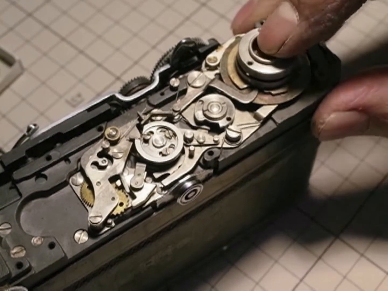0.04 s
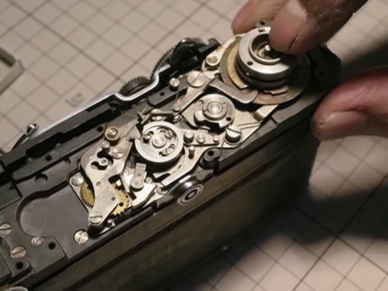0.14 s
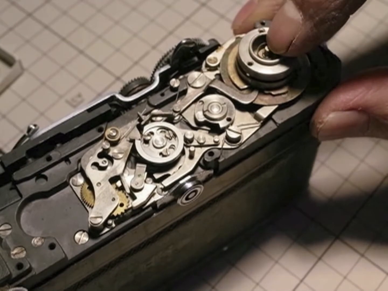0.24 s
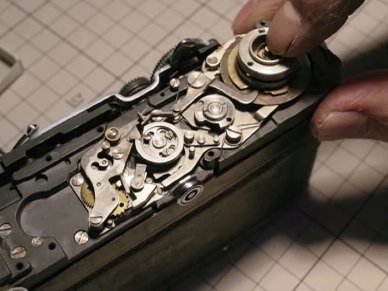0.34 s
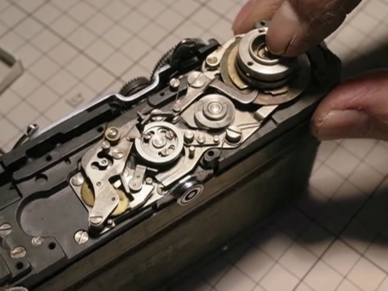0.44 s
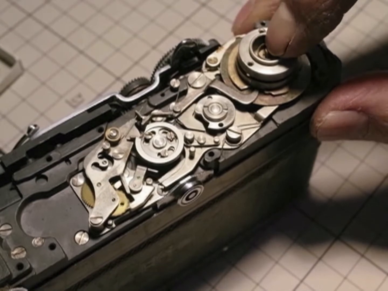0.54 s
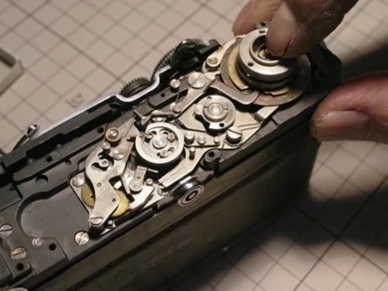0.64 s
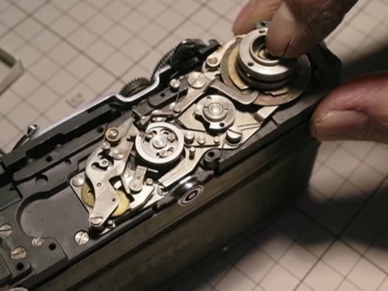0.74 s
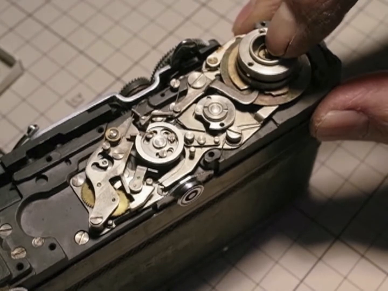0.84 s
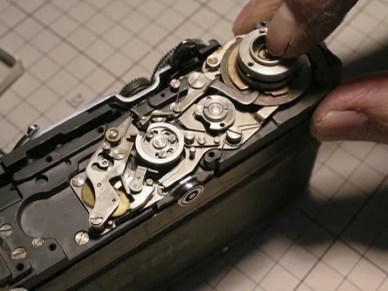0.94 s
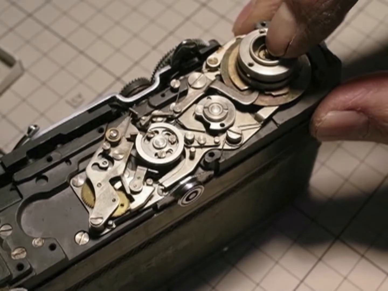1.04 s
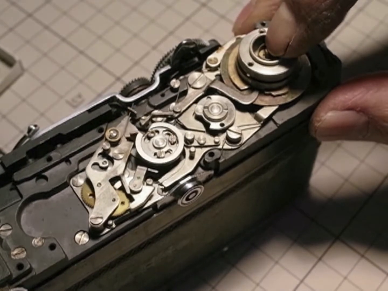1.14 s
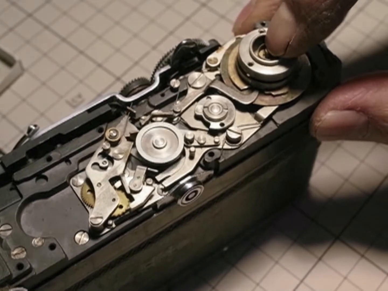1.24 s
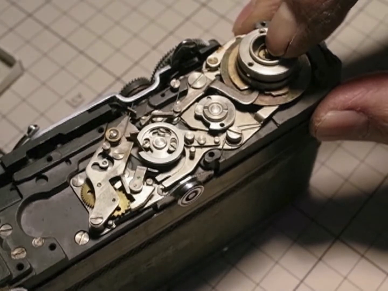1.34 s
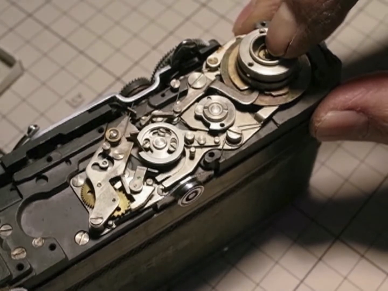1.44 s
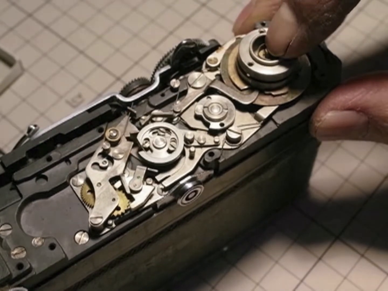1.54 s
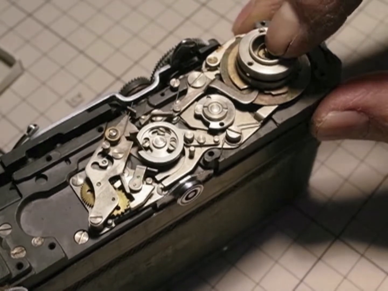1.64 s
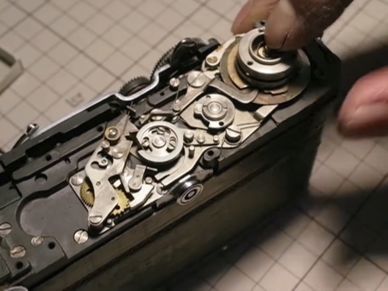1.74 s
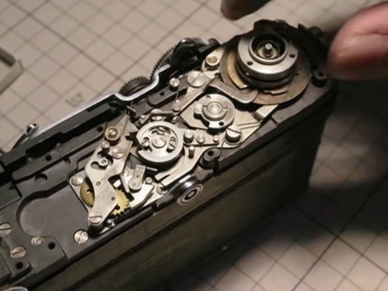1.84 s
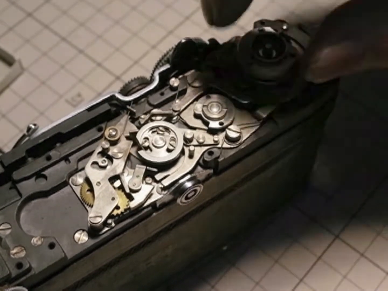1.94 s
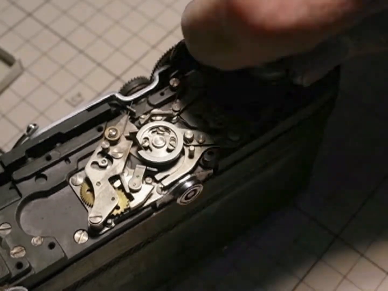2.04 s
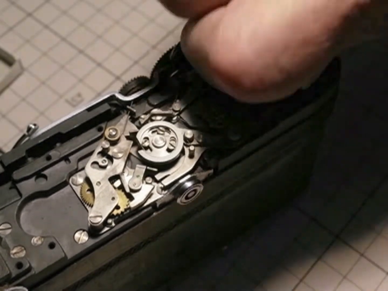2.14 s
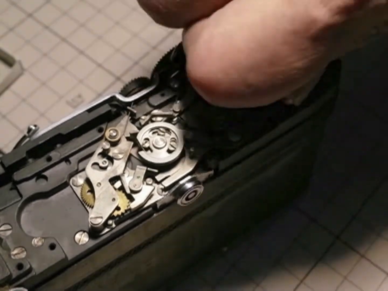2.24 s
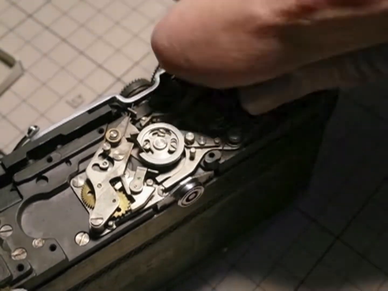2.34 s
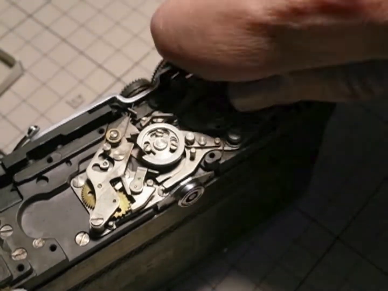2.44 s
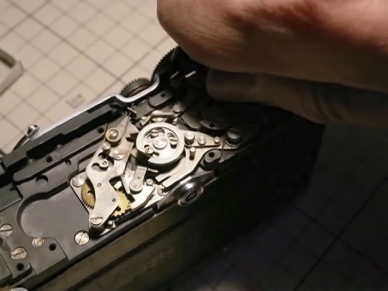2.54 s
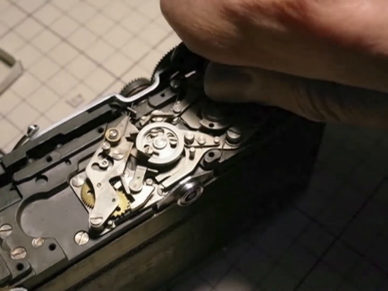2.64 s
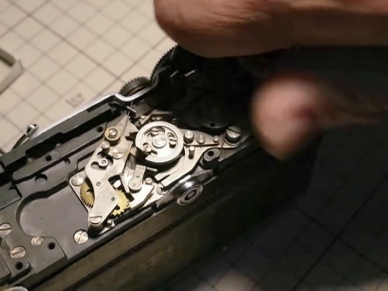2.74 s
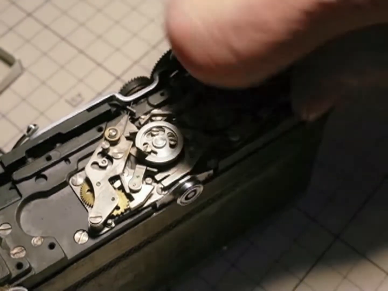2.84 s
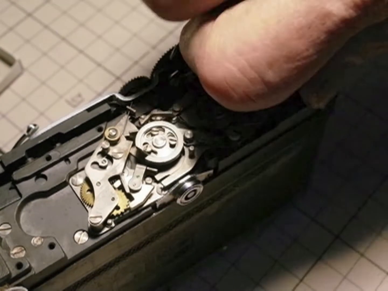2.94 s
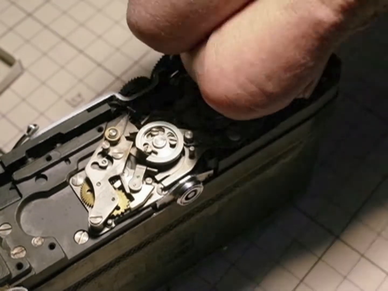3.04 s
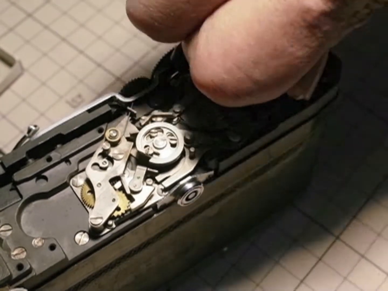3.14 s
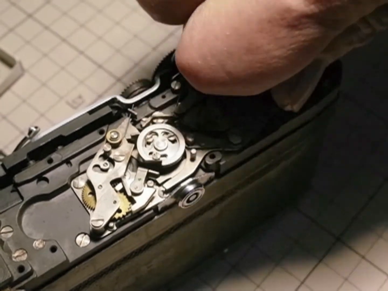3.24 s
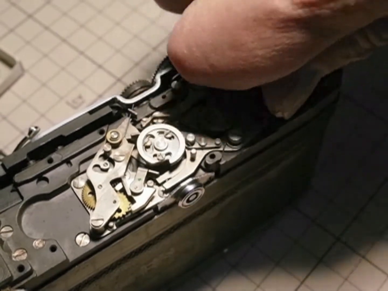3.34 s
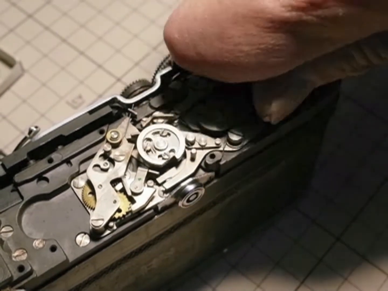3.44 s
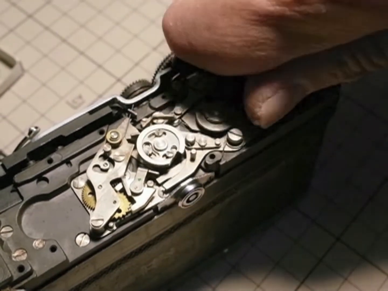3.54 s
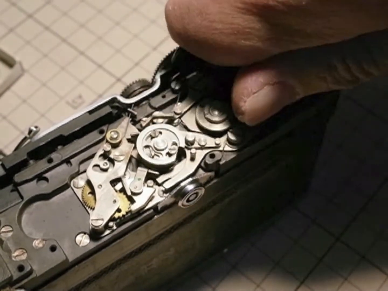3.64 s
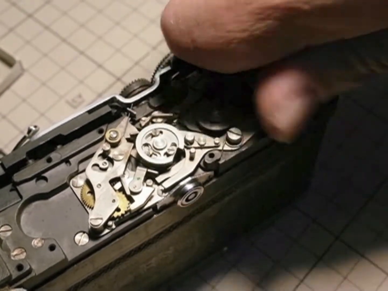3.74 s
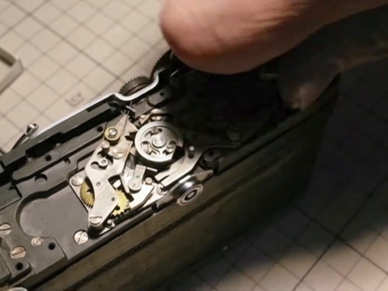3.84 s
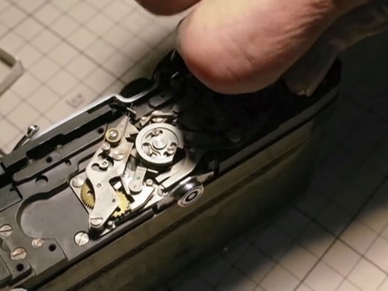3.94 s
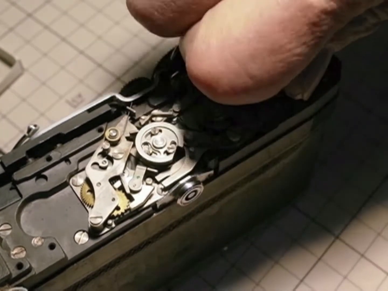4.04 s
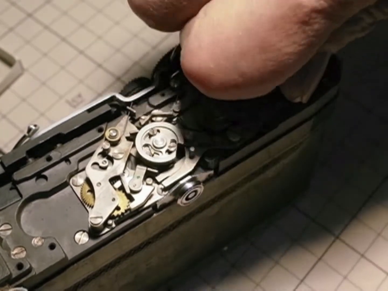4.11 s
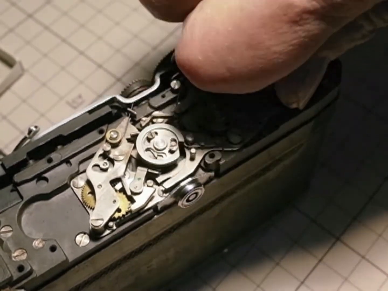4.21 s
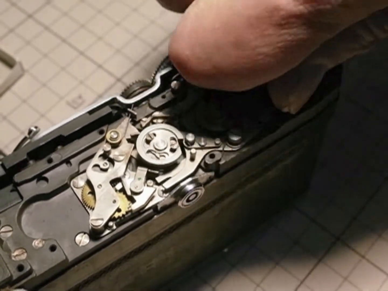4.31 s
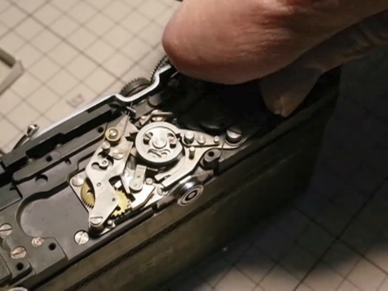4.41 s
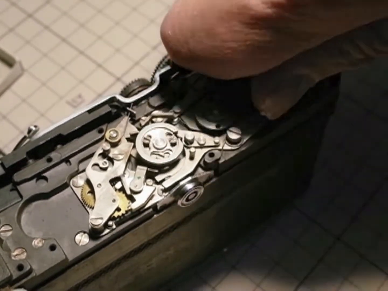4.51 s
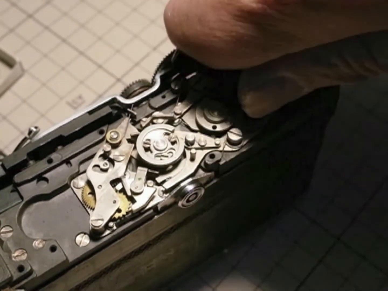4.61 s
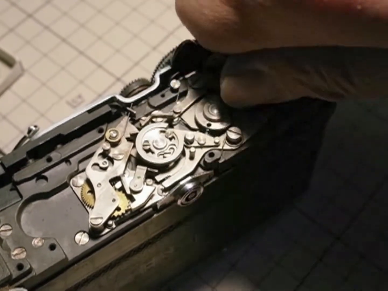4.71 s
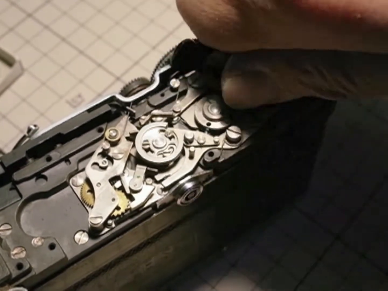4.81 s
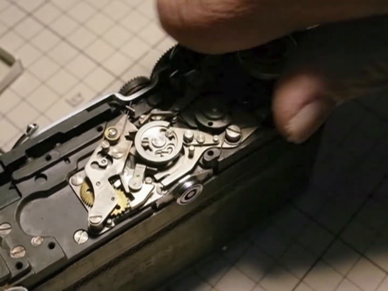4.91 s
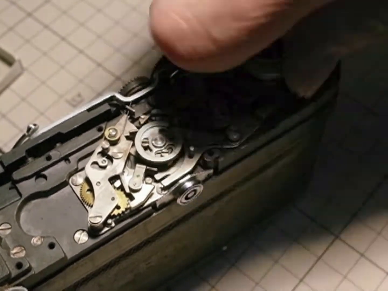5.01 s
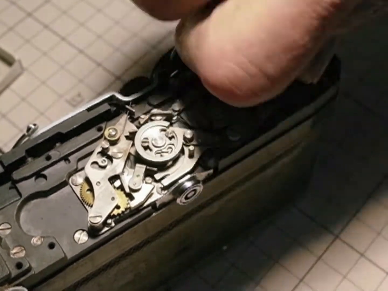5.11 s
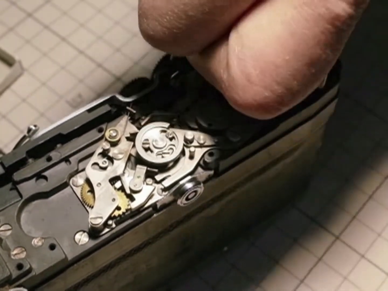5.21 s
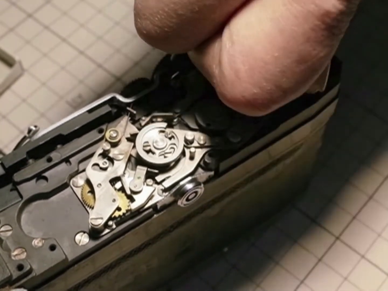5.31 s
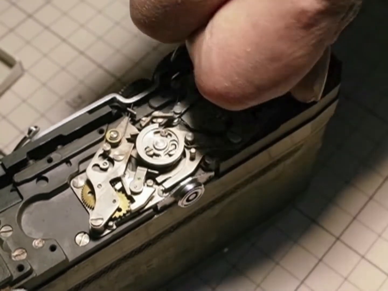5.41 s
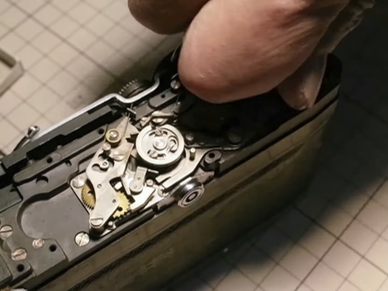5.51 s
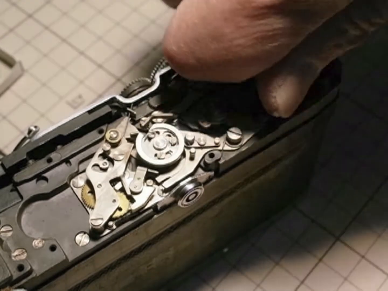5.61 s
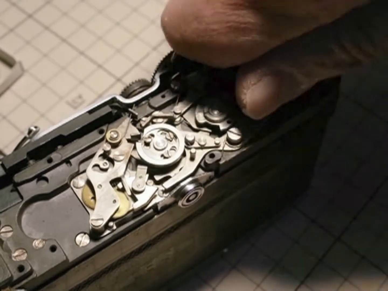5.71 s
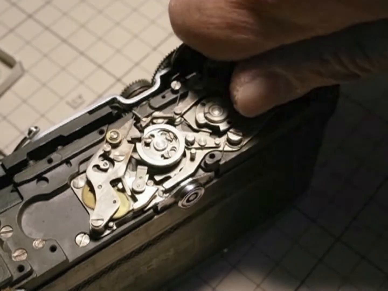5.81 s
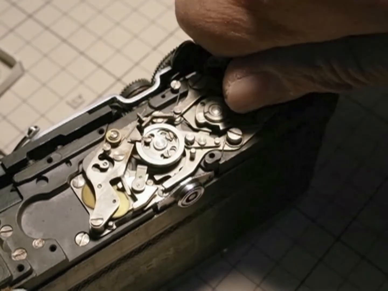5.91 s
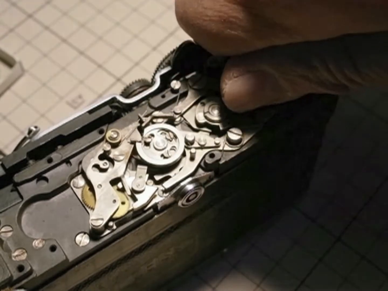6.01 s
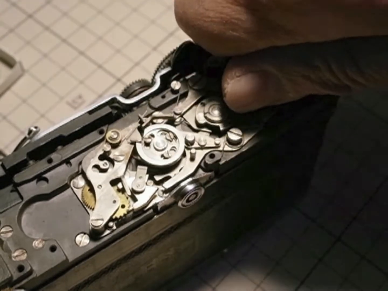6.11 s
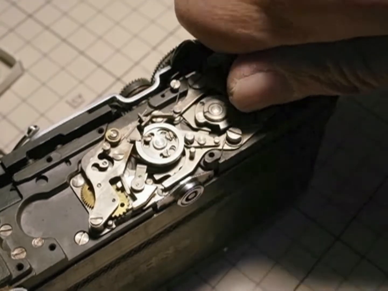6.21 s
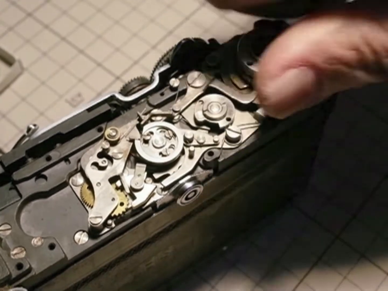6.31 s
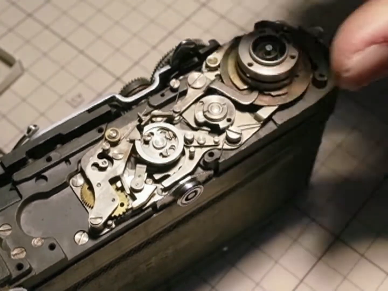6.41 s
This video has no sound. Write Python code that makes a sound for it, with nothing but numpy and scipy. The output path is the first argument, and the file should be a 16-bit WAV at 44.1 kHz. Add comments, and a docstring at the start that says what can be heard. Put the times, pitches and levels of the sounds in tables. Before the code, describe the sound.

A quiet indoor room: soft airy noise, low fan hum and a very faint whine throughout, with a barely audible distant chirp near 0.4 s. At 0.83-0.86 s an uncovered camera shutter fires very close by: a quick click, then a sharp bright snap with a brief whirr. From 0.87 to 1.59 s the escapement buzzes, a thin, high metallic chatter of roughly 250-300 uneven strikes per second, slowing slightly, then speeding up at the end. At 1.6 s the second curtain slams with a loud, dry clack and short rattle. Tiny latch ticks follow at 1.8 and 2.0 s. From 2.6 to 6.1 s fingers wind in short strokes: very quiet ratchet ticks in loose clusters, with faint gritty scrapes. Firmer clicks stand out at 3.52, 4.25 and 5.87 s, the last followed by a light scrape. Another faint chirp at 5.1 s; then only room hum.

```python
"""A quiet room with fan hum and a faint whine: on the desk, an uncovered camera shutter fires and is wound.
The first curtain flies open, the slow-speed escapement buzzes, the second curtain slams shut; fingers then
wind in short strokes with ratchet clicks. Blows are snaps and noise bursts filtered by the body or the metal
parts; whirrs and scrapes are gritty noise; the room is coloured noise, steady sines and faint chirps.
A small, bright microphone sits close by."""
import sys
import numpy as np
from scipy import signal
from scipy.fft import rfft, irfft
from scipy.io import wavfile
from scipy.ndimage import uniform_filter1d

SR = 44100
rng = np.random.default_rng(int(sys.argv[2]) if len(sys.argv) > 2 else 0)


def unload_wav(signal):
    """Save mono or channel-first audio to the path in sys.argv[1] as 16-bit WAV at rate SR, clipped to [-1, 1]."""
    wavfile.write(
        sys.argv[1],
        SR,
        np.round(np.clip(np.atleast_2d(signal).T, -1, 1) * 32767).astype(np.int16),
    )


N = 284886
HZ = np.fft.rfftfreq(8192, 1 / SR)  # frequency grid for the filter colours

# Curtain blows, bounces, button and latch drops; the band levels add to the level, sizzle by 3 dB at most:
# (time [s], level [dB], body knock [dB], plate clack [dB], top sizzle [dB], decay time [ms])
BLOWS = [(0.8262, -27, -12, 6, -10, 1.7), (0.8384, -17, -38, -12, -5, 1.5), (0.8412, -35, -32, -6, -6, 1.3),
         (0.8453, -23, -32, -11, -4, 1.1), (0.8475, -6.5, -10.5, -4, 1.5, 1.94),
         (0.8622, -29, -13, -7, -4, 0.86), (0.865, -32, -24, -12, -13, 0.41),
         (1.5922, -28, -14.5, -20, -14, 1.1), (1.5962, -27, -37, -4, -12, 0.6),
         (1.6039, -3.5, -13.5, -13, -10, 1.6), (1.6073, -10.5, -10.5, -16, -2.5, 0.54),
         (1.6103, -26.5, -7, 5, -6, 0.6), (1.6202, -34, -27, -15, 4, 1.2),
         (1.624, -25, -21, -4.5, -10, 1.16), (1.8329, -45.5, -4.5, -2, -3.5, 1.65),
         (2.0077, -58, 0.5, 15.5, -6, .3), (2.0091, -44, 4.5, 15.5, 2.5, 0.27),
         (3.5165, -58.5, -22, -10, 5, 2.7), (3.5226, -23.5, -15.5, -6, -2.5, 1.64),
         (4.2472, -23, -21, -13.5, -15, 0.98), (5.861, -50, -26.5, -15.5, -1, 2.64),
         (5.8666, -18.5, -17, -13, -4.5, 1.56), (5.8692, -28, -16, -2, -6, 0.59)]
# Ratchet ticks while winding: (time [s], level [dB], dullness [dB], top sizzle [dB])
RATCHET_TICKS = [(2.6, -62.5, 9.5, -9.5), (2.6865, -42, -16, -9), (2.6973, -47, 5.5, -18),
                 (2.729, -53, 2.5, -18), (2.748, -57, 2, -22.5), (2.7605, -52.5, 2, -22),
                 (2.793, -55, 4, -13), (2.8287, -40, -0.5, -5.5), (2.8616, -52, -0.5, -26.5),
                 (2.8754, -49.5, -4.5, -18), (3.001, -54.5, -4.5, -10), (3.0084, -54.5, -5.5, -7),
                 (3.031, -61, 9.5, -13.5), (3.331, -60, -4, -6), (3.414, -56, 4.5, -13),
                 (3.428, -61, 0, -13.5), (3.4687, -50, 3.5, -21), (3.474, -60, 7, -10),
                 (3.488, -61.5, 7.5, -15), (3.798, -55.5, -1, -5.5), (3.805, -50, -3, -15),
                 (3.8251, -54.5, 8, -8), (3.962, -61, 7.5, -17.5), (4.152, -51, -5, -5),
                 (4.168, -61, 6.5, -17), (4.562, -50.5, 2.5, -12.5), (4.577, -52, 1, -4),
                 (4.867, -47, -5.5, -12.5), (4.8766, -50.5, -3, -9), (4.884, -54, 0, -14),
                 (4.896, -60.5, 0, -13), (4.9232, -60, -2, -8.5), (4.9308, -51.5, 1, -9),
                 (4.9556, -43, -3.5, -16), (5.132, -60, -2.5, -12), (5.186, -57.5, -1.5, -12),
                 (5.3562, -55.5, -4, -3.5), (5.363, -50, -5.5, -23.5), (5.3694, -55, 6, -11),
                 (5.699, -61.5, -0.5, -14), (5.712, -55, -5, -8.5), (5.721, -56.5, 3.5, -13),
                 (5.73, -50.5, 1, -14.5), (5.7494, -46.5, 3, -8), (5.7536, -41, 1, -6.5),
                 (5.772, -56.5, -9, -5), (5.801, -53, -5, -11), (5.822, -57, -4, -12),
                 (5.8425, -53, -13, -4), (5.853, -63, 6, -15), (6.0046, -39.5, -2.5, -7.5),
                 (6.021, -57.5, -4.5, -10.5), (6.0992, -55.5, -5, -8)]
# Colour of a plain tick; dullness lifts the knock most
TICK_KNOCK_DB, TICK_CLACK_DB, KNOCK_PER_DULL, TICK_DECAY_MS = -16, -8.5, 2.6, 1
# Clean snap against the rough force: (knock, clack, bright, sizzle) [ratio]
BLOW_SNAP = [.7, 1.1, .7, .9]
# Loose rattle after a blow: (knock [dB], clack [dB], bright [dB], sizzle [dB])
BLOW_RATTLE_DB = [-19, -14.5, -16, -16.5]
# Broad colour of the damped camera body through the microphone: (frequency [Hz], relative level [dB])
BODY_COLOUR = [(480, -36), (900, -23), (1220, -11), (1750, -23.5), (2100, -13), (2350, -15.5), (2620, -13),
               (3050, -13.5), (4400, -7.5), (5000, -7), (5450, -10.5), (6300, -7.5), (7400, -10),
               (8150, -11), (8800, -6), (9250, -6.5), (9550, -10.5), (10500, -13.5), (12000, -11),
               (12800, -16.5), (13300, -13.5), (14300, -19.5), (15100, -18.5), (16500, -28.5)]
# Tops of the knock and clack bands: (knock [Hz], clack [Hz])
KNOCK_CLACK_TOP_HZ = (3000, 6800)
BRIGHT_TOP_HZ = 9450  # top of the microphone's bright band; sizzle lies above
# Low puffs as the slams push the desk: (time [s], level [dB], lowest [Hz], highest [Hz])
DESK_PUSHES = [(0.828, -49.5, 560, 901), (.847, -35.5, 650, 908), (.8475, -50.5, 50.6, 263),
               (1.604, -37.5, 430, 880), (1.604, -46, 150, 520)]

# Escapement wheel speed: (time [s], speed [teeth/s])
WHEEL_SPEED = [(.872, 149.7), (1.02, 124.9), (1.17, 128.3), (1.24, 120.8), (1.35, 120.1), (1.43, 136.5),
               (1.52, 136.5), (1.588, 160.2)]
# Share of a tooth at which each pallet strikes: (entry [teeth], exit [teeth])
PALLET_OFFSETS = (-.17, .21)
FIRST_TOOTH = .52  # where the wheel stands at the start [teeth]
# A faster wheel strikes harder: level [dB] at the reference speed [teeth/s], and its slope
STRIKE_DB, STRIKE_DB_PER_SPEED, REFERENCE_SPEED = -36.5, 0.11, 146.4
DULL_DB_PER_S = 2  # knock and clack rise as the run goes on
# Entry and exit pallet, added to the strike level: (level [dB], knock [dB], clack [dB], sizzle [dB])
PALLET_COLOUR_DB = [(9, -27.5, -16, -10.5), (9, -32, -19, -15)]
# Ring of the small escapement parts through the microphone: (frequency [Hz], width [Hz], relative level [dB])
METAL_RING = [(1250, 180, -27), (1620, 150, -33), (2500, 500, -28), (3150, 700, -35), (3800, 450, -29),
              (4250, 190, -19.5), (4880, 520, -21), (5380, 400, -17.5), (6150, 400, -23.5),
              (6750, 700, -21), (7450, 650, -15), (8030, 380, -9), (8760, 560, 0), (9120, 400, -5),
              (9900, 1000, -18), (10780, 450, -12.5), (11350, 350, -14), (11900, 500, -13),
              (12680, 420, -12), (13330, 450, -14), (14300, 1200, -23.5), (14900, 900, -23)]

# Curtains and gears whirring: (start [s], loudest [s], end [s], loudest level [dB])
CURTAIN_RUNS = [(0.826, 0.848, .872, -16), (1.583, 1.61, 1.645, -21)]
WHIRR_RISE_DB_PER_S, WHIRR_FALL_DB_PER_S = 698, 948
# Winding strokes, fingers and levers scraping: (time [s], length [s], level [dB], dullness [dB])
STROKES = [(1.809, 0.034, -63.5, 6), (2.603, 0.055, -73.5, 5.5), (2.657, 0.12, -64.5, 8),
           (2.799, 0.11, -64, 8), (2.999, 0.071, -71.5, 7), (3.324, 0.23, -73.5, 9.5),
           (3.776, 0.092, -66.5, 1), (4.144, 0.039, -65.5, 3.5), (4.327, 0.069, -70, 4),
           (4.554, 0.052, -66, 6), (4.884, 0.027, -63, 4), (4.92, 0.06, -73.5, 12.5), (5.085, 0.11, -74, 4),
           (5.227, 0.066, -68, 8), (5.343, 0.084, -69, 7.5), (5.675, 0.19, -75, 7.5),
           (5.925, 0.12, -59.5, -17), (6.085, 0.038, -65.5, -9)]
# Faint rubbing while winding: (time [s], level [dB])
RUBBING = [(1.64, -81.5), (1.8, -80.5), (2.09, -92), (2.3, -74), (2.81, -71), (2.96, -79.5), (3.46, -74.5),
           (3.89, -81.5), (5.11, -81.5), (5.25, -71.5), (5.42, -85.5), (5.74, -84.5), (5.9, -63),
           (6.05, -82.5), (6.45, -82)]

# Room air noise, set to AIR_DB overall: (frequency [Hz], relative level [dB])
AIR_COLOUR = [(30, -11.5), (300, -5), (400, -11), (600, -1), (1300, -17), (2100, -19), (2600, -18),
              (3400, -23.5), (4220, -14), (4650, -25), (5080, -18), (5800, -25.5), (7400, -20),
              (16000, -39.5)]
AIR_DB = -68.5
LUMP_DB, LUMP_HZ, LUMP_S = 1.6, 300, .05  # depth, width and length of random swells in the air noise
# One motor humming and whining on multiples of its speed: (multiple, level [dB rms])
MOTOR_TONES = [(1, -80), (2, -87), (4, -88), (5, -83), (48, -80), (50, -87)]
MOTOR_HZ = 48.675
# Other steady tones of fans and mains: (frequency [Hz], level [dB rms])
HUM_TONES = [(23.46, -72), (38.6, -81), (40.57, -66), (76.97, -88), (81.36, -90), (100.0, -87),
             (162.72, -86)]
# Faint distant chirps: (time [s], start [Hz], end [Hz], length [s], level [dB])
DISTANT_CHIRPS = [(0.382, 2770, 2400, 0.018, -71), (0.385, 2860, 2850, 0.055, -81),
                  (5.07, 3134, 3190, 0.06, -70.5)]
EDGE_HZ = 15800  # upper band limit


def blows_and_ticks():
    """Curtains, latches and the ratchet hit the camera body, which colours each short contact."""
    return contacts(BLOWS + ratchet_ticks(), body(), rise=.18, order=2,
                    tail_db=BLOW_RATTLE_DB, tail_ms=13.0, snap=BLOW_SNAP)


def ratchet_ticks():
    """Ratchet ticks as contacts of one length; a dull tick has more clack and still more knock."""
    return [(s, db, TICK_KNOCK_DB + KNOCK_PER_DULL * dull_db, TICK_CLACK_DB + dull_db, top_db, TICK_DECAY_MS)
            for s, db, dull_db, top_db in RATCHET_TICKS]


def contacts(rows, taps, rise, order, tail_db, tail_ms, snap):
    """A clean snap and a short rough force of set energy, then a dying rattle, less after a brief touch."""
    out = np.zeros(N + 8000)
    t = np.arange(4000) / SR * 1000  # ms
    grits = rng.standard_normal((len(rows), 4000))
    for (s, db, knock_db, clack_db, top_db, ms), grit in zip(rows, grits):
        force = (1 - np.exp(-t / (rise * ms))) ** order * np.exp(-t / ms)
        lumps = gain_of(20 * uniform_filter1d(grit[::-1], 60))  # the rattle comes in lumps
        rattle = min(ms, 1) * lumps * (1 - np.exp(-t / 1.4)) * np.exp(-t / tail_ms)
        shape = force / force.max() + np.outer(gain_of(tail_db), rattle)
        size = np.linalg.norm(shape, axis=1, keepdims=True)
        drive = shape * grit + size * np.outer(snap, t == 0)
        sound = signal.fftconvolve(drive, taps, axes=1)
        sound *= size / np.linalg.norm(sound, axis=1, keepdims=True)
        band_db = [db + knock_db, db + clack_db, db, db + min(top_db, 3)]
        out[round(s * SR):][:sound.shape[1]] += gain_of(band_db) @ sound
    return out[:N]


def body():
    """Knock of the damped camera body, as four band responses."""
    f, db = np.transpose(BODY_COLOUR)
    return bands(gain_of(np.interp(np.log(HZ + 1), np.log(f), db, left=-60)))


def thuds():
    """Each slam pushes the desk: one solid knock with a short puff of low noise."""
    out, t = np.zeros(N), np.arange(4000) / SR
    for s, db, low_hz, top_hz in DESK_PUSHES:
        push = (t == 0) + .09 * np.exp(-t / 0.0056) * rng.standard_normal(4000)
        band = signal.butter(3, [low_hz, top_hz], "band", fs=SR, output="sos")
        puff = signal.sosfilt(band, push)
        out[round(s * SR):][:4000] += gain_of(db) * puff / np.std(puff[:900])
    return out


def escapement():
    """Every tooth strikes two pallets, unevenly spaced and each a little different, over a gear whirr."""
    t = np.arange(N) / SR
    speed = np.interp(t, *np.transpose(WHEEL_SPEED), left=0, right=0)
    running = speed > 0
    teeth = FIRST_TOOTH + np.cumsum(speed) / SR
    level_db = STRIKE_DB + STRIKE_DB_PER_SPEED * (speed - REFERENCE_SPEED)
    dull_db = DULL_DB_PER_S * (t - WHEEL_SPEED[0][0])

    strikes = (np.arange(1, int(teeth[-1]) + 1)[:, None] + PALLET_OFFSETS).ravel()
    luck = rng.standard_normal((len(strikes), 3))
    late = np.resize([.012, .035], len(strikes)) * luck[:, 0]  # in teeth; the exit pallet wanders more
    at = np.interp(strikes + late, teeth[running], t[running])

    pallet_db = np.resize(PALLET_COLOUR_DB, (len(at), 4)) + [1.8, .7, .7, .7] * luck[:, [1, 2, 2, 2]]
    pallet_db[:, 0] += np.interp(at, t[running], level_db[running])
    pallet_db[:, 1:3] += np.interp(at, t[running], dull_db[running])[:, None]
    rows = np.c_[at, pallet_db, np.full(len(at), .16)]  # decay time in ms
    parts = metal()
    buzz = contacts(rows, parts, rise=8., order=5, tail_db=[-8] * 4, tail_ms=4., snap=[3.5, 2.2, .3, 1.3])

    whirr = gain_of(level_db) * running * rng.standard_normal(N)
    gear_db = [[-27], [-19], [-19], [-17]] + np.outer([1, 1, 0, 0], dull_db)
    return buzz + ring(gain_of(gear_db) * whirr, parts)


def metal():
    """Resonances of the small escapement parts, as four band responses."""
    power = sum(gain_of(db) ** 2 / (1 + (2 * (HZ - f) / w) ** 2) ** 2 for f, w, db in METAL_RING)
    return bands(np.sqrt(power))


def curtains():
    """Both curtains rattle along their rails, louder as they speed up, dying away after the stop."""
    grit = .7 * gritty(2000, 2.) + .7 * rng.standard_normal(N)
    whirr = np.zeros(N)
    for start, top, end, db in CURTAIN_RUNS:
        start_db = db - WHIRR_RISE_DB_PER_S * (top - start)
        end_db = db - WHIRR_FALL_DB_PER_S * (end - top)
        whirr += sliding([(start, start_db), (top, db), (end, end_db)], grit)
    return gain_of([[-16], [-9], [-1.5], [-8]]) * whirr


def winding():
    """Skin and gears rub faintly; each stroke scrapes with crackle that differs from band to band."""
    strokes = np.zeros((4, N))
    for s, length, db, dull_db in STROKES:
        swell = signal.windows.tukey(round(length * SR), .7)
        colour_db = db + np.array([[1.65 * dull_db - 10.0], [0.69 * dull_db - 4.5], [0], [-11]])
        strokes[:, round(s * SR):][:, :len(swell)] += gain_of(colour_db) * swell
    rub_grit = .45 * gritty(300, 2.8) + .8 * rng.standard_normal(N)
    rub = gain_of([[-14], [-8], [-1.5], [-6]]) * sliding(RUBBING, rub_grit)
    dull, bright = gritty(300, 2.8), gritty(300, 2.8)
    crackle = .6 * np.array([dull, dull + bright, bright, bright]) + .5 * rng.standard_normal(N)
    return rub + strokes * crackle


def gritty(per_s, spread_db):
    """Dense tiny contacts of very uneven size, as decaying noise puffs at rms 1."""
    hits = rng.random(N) < per_s / SR
    size = gain_of(spread_db * np.minimum(rng.exponential(1, N), 4)) * hits
    return evened(signal.lfilter([1], [1, -.96], size) * rng.standard_normal(N))


def sliding(rows, grit):
    """Rubbing surfaces: grit played along a level curve, practically silent outside it."""
    s, db = np.transpose(rows)
    return gain_of(np.interp(np.arange(N) / SR, s, db, left=-150, right=-150)) * grit


def room_tail(x):
    """Adds a faint, short room tail of decaying noise."""
    t = np.arange(8000) / SR
    far = rng.standard_normal(8000) * (t > .005) * gain_of(-60 * t / 0.24)  # falls 60 dB in 0.24 s
    return x + gain_of(-34.5) * signal.oaconvolve(x, far / np.linalg.norm(far))[:N]


def room():
    """The background: air noise, steady tones and faint chirps."""
    return air() + steady_tones() + chirps()


def air():
    """Room air as coloured noise that swells and sags in patches."""
    f, db = np.transpose(AIR_COLOUR)
    colour = gain_of(np.interp(np.log(np.fft.rfftfreq(N, 1 / SR) + 1), np.log(f), db))
    noise = irfft(rfft(rng.standard_normal(N)) * colour, N)
    return gain_of(AIR_DB) * evened(lumpy(noise))


def lumpy(x):
    """Noise made to swell and sag in patches of time and pitch."""
    hz, t, z = signal.stft(x, SR, nperseg=1024, noverlap=768)
    patches = uniform_filter1d(rng.standard_normal(z.shape), round(LUMP_HZ / hz[1]), axis=0)
    patches = evened(uniform_filter1d(patches, round(LUMP_S / (t[1] - t[0])), axis=1))
    return signal.istft(z * gain_of(LUMP_DB * patches), SR, nperseg=1024, noverlap=768)[1][:N]


def steady_tones():
    """Motor, fans and mains hum as steady sines, the motor's on multiples of its speed."""
    t, out = np.arange(N) / SR, np.zeros(N)
    tones = HUM_TONES + [(k * MOTOR_HZ, db) for k, db in MOTOR_TONES]
    for (f, db), start in zip(tones, rng.random(len(tones))):
        out += np.sqrt(2) * gain_of(db) * np.sin(2 * np.pi * (f * t + start))
    return out


def chirps():
    """Distant chirps: gliding sines that swell quickly, fade slowly and waver in level."""
    t, out = np.arange(N) / SR, np.zeros(N)
    for s, start_hz, end_hz, length, db in DISTANT_CHIRPS:
        u = np.clip((t - s) / length, 0, 1)
        waver = gain_of(4.5 * evened(uniform_filter1d(rng.standard_normal(N), 200)))
        swell = np.sin(np.pi * np.sqrt(u))
        tone = np.sin(2 * np.pi * np.cumsum(start_hz + (end_hz - start_hz) * u) / SR)
        out += np.sqrt(2) * gain_of(db) * waver * swell * tone
    return out


def ring(drives, taps):
    """Four drives, one for each band, excite a resonating thing."""
    return signal.oaconvolve(drives, taps, axes=1)[:, :N].sum(0)


def bands(gain):
    """Responses of a colour in four bands: knock, clack, bright, sizzle."""
    below = [1 / (1 + (HZ / edge) ** 30) for edge in (*KNOCK_CLACK_TOP_HZ, BRIGHT_TOP_HZ)]
    shares = np.diff([0 * HZ, *below, 1 + 0 * HZ], axis=0)
    return np.array([causal(gain * share) for share in np.clip(shares, 0, 1)])


def causal(gain):
    """Minimum-phase impulse response of energy 1 for a magnitude on 0..SR/2."""
    log_gain = np.log(np.r_[gain, gain[-2:0:-1]] + 1e-5)
    taps = np.fft.ifft(np.exp(np.conj(signal.hilbert(log_gain)))).real[:2048]
    return taps / np.linalg.norm(taps)


def gain_of(db):
    """Decibels to gain."""
    return 10 ** (np.asarray(db) / 20)


def evened(x):
    """Scales to rms 1."""
    return x / np.sqrt(np.mean(x ** 2) + 1e-20)


def scene():
    """The mechanism sounds on the desk with its short tail, over the room."""
    rubbing = ring(curtains() + winding(), body())
    mechanism = blows_and_ticks() + escapement() + rubbing + thuds()
    return (room_tail(mechanism) + room())[None]


def record(dry):
    """The slams overload the input softly; then the treble is cut at the band limit."""
    soft = .8 * np.tanh(dry / .8)
    lowpass = signal.firwin(511, EDGE_HZ, window=("kaiser", 9), fs=SR)
    return signal.oaconvolve(soft, lowpass[None], "same")


dry = scene()
out = record(dry)
unload_wav(out)
```